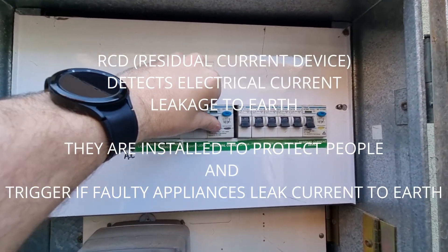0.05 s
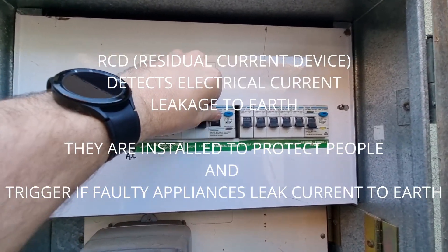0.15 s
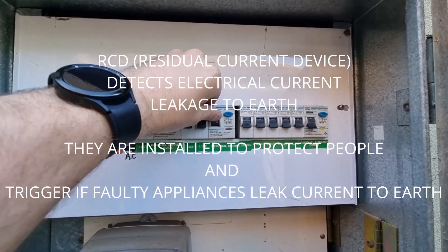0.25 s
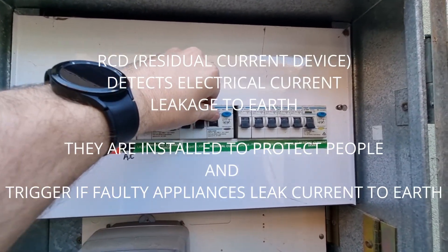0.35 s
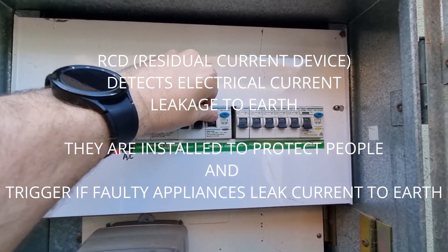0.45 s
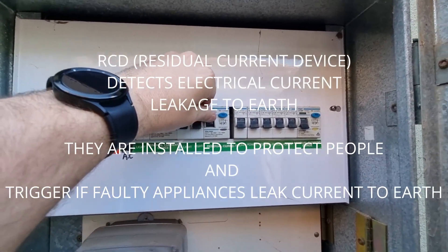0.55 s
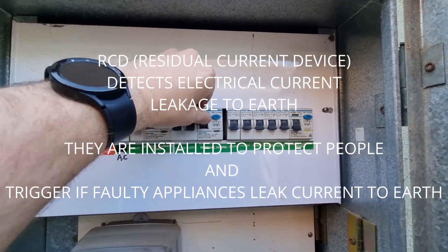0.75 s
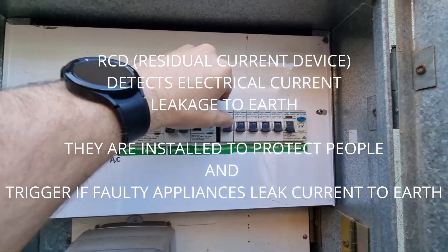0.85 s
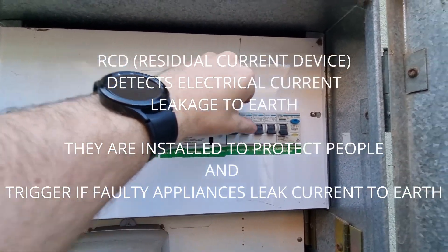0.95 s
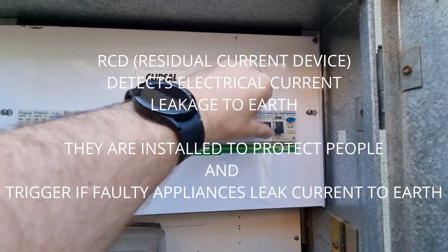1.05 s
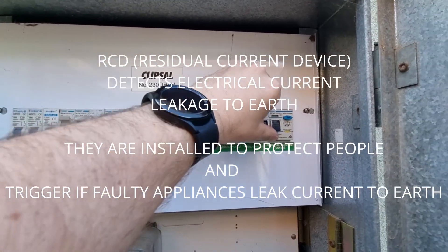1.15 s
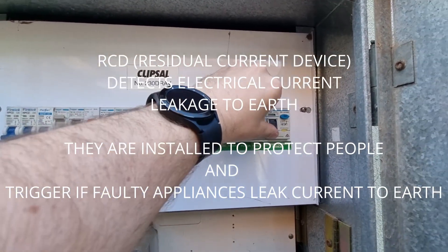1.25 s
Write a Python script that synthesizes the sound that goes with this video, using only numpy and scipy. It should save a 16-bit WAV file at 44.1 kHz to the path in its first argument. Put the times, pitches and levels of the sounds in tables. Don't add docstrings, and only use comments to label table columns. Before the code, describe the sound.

Close up, a circuit breaker switch is flicked once with a crisp double click and hollow thud, small knocks trailing after; then only far traffic, low gusts, barely audible birds and hiss outdoors.

```python
import sys
import numpy as np
from scipy import signal
from scipy.fft import rfft, irfft, next_fast_len
from scipy.io import wavfile
from scipy.ndimage import map_coordinates

SR = 44100
rng = np.random.default_rng(int(sys.argv[2]) if len(sys.argv) > 2 else 0)


def volts_from_db(level):
    exponent = np.asarray(level, float) / 20
    return 10 ** exponent


def int16_out(signal):
    q = np.round(np.clip(np.atleast_2d(signal).T, -1, 1) * 32767)
    wavfile.write(sys.argv[1], SR, q.astype(np.int16))


N = 57330

# (time [s], crack level [dB], crack t60 [s], panel blow level [dB], knock pitch [Hz])
CONTACTS = [(-.002, -90, 0.068, -48.5, 266), (.008, -100, 0.046, -61.5, 785),
            (0.023, -71.5, 0.082, -82.5, 895), (.102, -74, 0.025, -75.5, 960),
            (.1216, -54, 0.089, -55.5, 910), (.140, -63, 0.036, -51.5, 377), (0.145, -75, 0.041, -73, 2406),
            (.2390, -24.5, 0.05, -43.5, 2460), (0.2446, -33, 0.048, -37, 1020),
            (0.2693, -36.5, 0.047, -32.5, 410), (0.2732, -42.5, 0.098, -30, 943),
            (.289, -45.5, 0.077, -30, 471), (0.3138, -49, 0.056, -45, 1140), (.326, -64, 0.034, -35, 420),
            (0.348, -62.5, 0.095, -64, 460), (.415, -72.5, .06, -52, 630), (.844, -78, 0.026, -73.5, 1310),
            (1.278, -100.5, .05, -51.5, 320)]
# (time [s], level [dB], pitch [Hz], t60 [s])
KNOCKS = [(.002, -44.5, 280, 0.043), (0.011, -55.5, 840, 0.067), (.024, -79, 2380, 0.046),
          (.027, -52.5, 890, 0.049), (.037, -77, 410, 0.018), (.126, -63, 2270, 0.042),
          (.124, -63, 910, 0.033), (.147, -66, 2350, 0.06), (.2694, -16.5, 290, .045),
          (.2425, -47, 1090, .05), (.246, -37, 880, 0.04), (.243, -40.5, 165, 0.11), (.272, -43, 180, 0.1),
          (.2745, -29, 845, 0.076), (.300, -39, 276, 0.27), (.303, -36.5, 465, .16),
          (.350, -36.5, 420, 0.11), (.412, -52, 827, 0.11), (.1265, -61, 8050, .045),
          (.248, -42, 257, 0.063), (.3137, -46, 5700, .025), (.3142, -49, 6600, 0.022),
          (0.396, -51, 420, 0.12), (.29, -44, 149.7, 0.14), (.348, -48, 575, 0.11), (.318, -40, 455, 0.089),
          (.322, -40.5, 270, 0.14), (.282, -34, 594, 0.089), (.2700, -31, 571, 0.052),
          (.2702, -37, 1340, 0.042), (0.2918, -19.5, 393, 0.022), (.438, -42, 390, 0.07),
          (.598, -58.5, 636, 0.028), (.8452, -59.5, 1084, 0.046), (1.279, -62, 320, 0.086)]
# (time [s], level [dB], t60 [s])
SNAPS = [
    (.1225, -56, .016),
    (.1435, -63, .006),
    (.2392, -30, .012),
    (.2692, -32, .007),
]
# (end [s], build-up [s], start pitch [Hz], end pitch [Hz], peak level [dB], overtone level [dB])
SQUEAKS = [
    (0.123, 0.0089, 7610, 7930, -46.5, -26),
    (0.2412, .014, 5200, 6126, -28.5, -4.5),
]
# (frequency [Hz], density [dB])
CRACK = [(710, -25), (1200, -31), (1660, -17.5), (3440, -5.5), (3750, -18), (4460, -7.5), (5350, -0.5),
         (7390, -1.5), (15700, -12)]
# (frequency [Hz], level [dB], t60 [s])
CASE = [(2125, -11, 0.17), (2577, -6, 0.079), (3847, -5.5, 0.058), (5530, 1, 0.0158), (6860, -12, 0.037),
        (5620, 9, 0.03), (6490, 5, 0.025), (8460, -8, 0.02), (9480, 0, 0.017), (11600, -10, 0.025),
        (11020, -14, 0.017), (13800, -8, 0.02)]
# (frequency [Hz], level [dB], t60 [s])
PANEL = [(270, -4.5, 0.29), (385.4, -13, 0.49), (420, -12.5, 0.49), (472.6, -7, 0.53), (565, -25, 0.22),
         (859.5, -16, 0.22), (1078, -16, 0.12), (1194, -25, 0.26), (1477, -23.5, 0.3), (1657, -22.5, 0.25),
         (1790, -27, 0.13), (1968, -21.5, 0.26), (2418, -23.5, 0.13), (790.6, -14.5, 0.18)]
# (frequency [Hz], density [dB])
BOOM = [(35, -58.5), (60, -6), (183, -2.5), (255, -0.5), (404, -4), (1560, -16.5), (1710, -25.5),
        (2000, -16), (6000, -20.5), (7800, -61), (13200, -120)]
# (frequency [Hz], t60 [s])
BOOM_T60_S = [(100, 0.34), (300, 0.3), (900, 0.24), (2500, 0.24), (6000, 0.155)]
# (frequency [Hz], t60 [s])
BOX = [(500, 0.41), (3000, 0.28), (12000, 0.11)]
# (time [s], roar level [dB], bright edge level [dB])
TRAFFIC = [(0, -70, -3), (.5, -67, 3), (.67, -71.5, -11), (.8, -72, 6.5), (.92, -72, 6), (1.02, -71, -7),
           (1.15, -70, -5.5), (1.3, -71, 8.5)]
# (frequency [Hz], density [dB])
ROAR = [(110, -23.5), (180, -8.5), (420, 0), (495, -11.5), (598, 0.5), (697, -8.5), (1040, -9),
        (3000, -49.5), (3900, -57), (6600, -120)]
# (frequency [Hz], density [dB])
EDGE = [(800, -120), (1100, -2), (1500, 2), (2100, -12.5), (2800, -120)]
# (time [s], rumble level [dB])
GUSTS = [(0.0, -58), (0.046, -79), (0.136, -61.5), (0.21, -65), (0.269, -58), (0.314, -64), (0.35, -56),
         (0.404, -71), (0.44, -59.5), (0.492, -64.5), (0.516, -72.5), (0.636, -71.5), (0.654, -66),
         (0.73, -62.5), (0.756, -68.5), (0.976, -68.5), (1.056, -63), (1.3, -71)]
# (frequency [Hz], density [dB])
RUMBLE = [(15, -60), (30, -26), (45, -1), (65, 2.5), (129, -1), (204, -20), (250, -10), (320, -57),
          (550, -120)]
# (time [s], length [s], start pitch [Hz], end pitch [Hz], level [dB])
CHIRPS = [(.519, .055, 3630, 3530, -81), (.568, .045, 3550, 3650, -83), (.676, .02, 3700, 3650, -82),
          (.705, .027, 3500, 3450, -86), (.63, .08, 2300, 2160, -87), (.75, .015, 3720, 3730, -85),
          (.83, .04, 3550, 3560, -86), (.879, .025, 3600, 3400, -81), (.905, .05, 3550, 3500, -89),
          (.912, .06, 2320, 2350, -88), (1.199, .04, 3800, 3720, -83), (1.244, .04, 3400, 3400, -88)]
# (frequency [Hz], density [dB])
HISS = [(1470, -18.5), (2500, -3.5), (3150, -9.5), (3560, -5), (3930, -6), (5390, -2.5), (8420, -2),
        (15700, -7.5)]
# (frequency [Hz], gain [dB])
SIDE_GAIN = [(300, -63.5), (2000, -20.5), (5000, -11.5), (9000, -8.5), (14000, -4.5)]
# (frequency [Hz], density [dB])
SNAP_EDGE = [(1500, -20), (5000, 4), (15500, 0)]
SCRAPE = [(1040, -30), (5200, 0), (12000, -4), (15500, -12)]

CASE_DB, CRACK_RISE_S = -12, .0011
TICK_DB, TICK_T60_S = -1, 0.0092
HARD_DB, DULLEST_DB, DULL_DB_PER_OCT, DULL_HZ = -44, -5, 2.5, 7000
RING_DB, BOOM_DB, BLOW_RISE_S = -7.5, -9, 0.00027
KNOCK_WIDTH_RATIO = 0.69
SQUEAK_RISE_DB, SQUEAK_T60_S, SQUEAK_ROUGH_RATIO = 28, .035, .45
TONE_STEEPER_RATIO = 1.1
WAVER_RATIO, HARSH_SHARE, SCRAPE_DB = .05, 0.3, -5
BOX_DB, EDGE_DB, HISS_DB = -25, -17.5, -77
BROKEN_DB = 3
SIDE_DB, SIDE_LAG_SAMPLES, PORT_RUMBLE_DB, PORT_PANEL_DB = -19.5, 3, -40, -54
TOP_HZ = 15850


def unit(x):
    return x / np.sqrt(np.mean(x ** 2) + 1e-20)


def along(points, hz):
    f, v = np.transpose(points)
    return np.interp(np.log(hz + 1), np.log(f + 1), v)


def wobble(rate_hz, size=N):
    knots = rng.standard_normal(int(size * rate_hz / SR) + 4)
    return map_coordinates(knots, [np.arange(size) * rate_hz / SR])


def filtered(x, response):
    m = next_fast_len(x.shape[-1] + 8192)
    spectrum = rfft(x, m) * response(np.fft.rfftfreq(m, 1 / SR))
    return irfft(spectrum, m)[..., :x.shape[-1]]


def noise(spectrum, size=N):
    return unit(filtered(rng.standard_normal(size), lambda hz: volts_from_db(along(spectrum, hz))))


def dying(x, decays):
    hz, t, z = signal.stft(x, SR, nperseg=256)
    decay = volts_from_db(-60 * t / along(decays, hz)[:, None])
    return signal.istft(z * decay, SR, nperseg=256)[1][:len(x)]


def ring(modes, t):
    out = np.zeros(len(t))
    for k, (hz, db, t60_s) in enumerate(modes):
        level_db = db + rng.normal(0, 1.7) - 60 * t / t60_s
        out += (-1) ** k * volts_from_db(level_db) * np.sin(2 * np.pi * hz * t)
    return out


def empty_track():
    return np.zeros(N + 2 * SR)


def add(track, s, x):
    track[SR + round(s * SR):][:len(x)] += x


def trimmed(track):
    return track[SR:SR + N]


def housing_crack(crack_db, t60_s, t):
    crack = noise(CRACK, size=len(t)) * volts_from_db(-60 * t / t60_s)
    crack += volts_from_db(CASE_DB) * ring(CASE, t)
    crack += volts_from_db(TICK_DB - 60 * t / TICK_T60_S) * rng.standard_normal(len(t))
    softness_db = np.clip(crack_db - HARD_DB, DULLEST_DB, 0)

    def dull(f):
        octaves = np.log2(np.maximum(f / DULL_HZ, 1))
        return volts_from_db(DULL_DB_PER_OCT * softness_db * octaves)

    return volts_from_db(crack_db) * filtered(crack, dull) * (1 - np.exp(-t / CRACK_RISE_S))


def panel_blow(blow_db, hz, t):
    panel = volts_from_db(BOOM_DB) * dying(noise(BOOM, size=len(t)), BOOM_T60_S)
    panel += volts_from_db(RING_DB) * ring(PANEL, t)

    def knock(f):
        damping = 1j * f * hz * KNOCK_WIDTH_RATIO
        return volts_from_db(-along(BOOM, hz)) * damping / (hz * hz - f * f + damping)

    return volts_from_db(blow_db) * filtered(panel * (1 - np.exp(-t / BLOW_RISE_S)), knock)


def contacts():
    bright, low, t = empty_track(), empty_track(), np.arange(SR // 2) / SR
    for s, crack_db, t60_s, blow_db, hz in CONTACTS:
        add(bright, s, housing_crack(crack_db, t60_s, t))
        add(low, s, panel_blow(blow_db, hz, t))
    return trimmed(bright), trimmed(low)


def snaps():
    out, t = empty_track(), np.arange(SR // 2) / SR
    for s, db, t60_s in SNAPS:
        add(out, s, volts_from_db(db - 60 * t / t60_s) * noise(SNAP_EDGE, size=len(t)))
    return trimmed(out)


def squeaks():
    out, t = empty_track(), np.arange(SR // 10) / SR
    size = len(t)
    for end_s, rise_s, hz0, hz1, db, over_db in SQUEAKS:
        waver = 1 + WAVER_RATIO * volts_from_db(HARSH_SHARE * over_db) * wobble(600, size)
        hz = np.interp(t, [0, rise_s], [hz0, hz1]) * waver
        phase = 2 * np.pi * np.cumsum(hz) / SR
        building_db = SQUEAK_RISE_DB * (t / rise_s - 1)
        level_db = np.where(t < rise_s, building_db, -60 * (t - rise_s) / SQUEAK_T60_S)
        tone = np.sin(phase) + volts_from_db(over_db) * np.sin(2 * phase)
        tone *= 1 + SQUEAK_ROUGH_RATIO * wobble(867, size)
        scrape = volts_from_db(SCRAPE_DB + HARSH_SHARE * over_db) * noise(SCRAPE, size)
        squeak = volts_from_db(TONE_STEEPER_RATIO * level_db) * tone + volts_from_db(level_db) * scrape
        add(out, end_s - rise_s, volts_from_db(db) * np.minimum(t / 0.00201, 1) * squeak)
    return trimmed(out)


def knocks():
    out, t = empty_track(), np.arange(SR // 5) / SR
    for s, db, hz, t60_s in KNOCKS:
        thump = volts_from_db(db - 60 * t / t60_s) * np.sin(2 * np.pi * hz * t)
        add(out, s, thump * (1 - np.exp(-t * hz / 0.62)))
    return trimmed(out)


def box(x):
    tail = dying(rng.standard_normal(SR // 2), BOX)
    return signal.fftconvolve(x, tail / np.linalg.norm(tail))[:N]


def traffic():
    s, roar_db, edge_db = np.transpose(TRAFFIC)
    t = np.arange(N) / SR
    edge = volts_from_db(EDGE_DB + np.interp(t, s, edge_db)) * noise(EDGE)
    return volts_from_db(np.interp(t, s, roar_db) + 0.6 * wobble(10)) * (noise(ROAR) + edge)


def rumble():
    s, db = np.transpose(GUSTS)
    level_db = np.interp(np.arange(N) / SR, s, db) + 0.86 * wobble(33)
    return volts_from_db(level_db) * noise(RUMBLE)


def birds():
    out = empty_track()
    for s, length_s, hz0, hz1, db in CHIRPS:
        u = np.linspace(0, 1, round(length_s * SR))
        hz = (hz0 + (hz1 - hz0) * u) * (1 + 0.012 * wobble(230, size=len(u)))
        phase = 2 * np.pi * np.cumsum(hz) / SR
        flutter = unit(volts_from_db(BROKEN_DB * wobble(130, size=len(u))))
        add(out, s, volts_from_db(db) * flutter * np.sin(np.pi * u) ** .5 * np.sin(phase))
    return trimmed(out)


def hiss():
    return volts_from_db(HISS_DB) * noise(HISS)


def scene():
    bright, low = contacts()
    bright = bright + snaps() + squeaks()
    low = low + knocks()
    mid = bright + low + volts_from_db(BOX_DB) * box(bright)
    mid = mid + traffic() + rumble() + birds() + hiss()
    other = volts_from_db(SIDE_DB) * np.roll(bright, SIDE_LAG_SAMPLES) + hiss()
    side = filtered(other, lambda hz: volts_from_db(along(SIDE_GAIN, hz)))
    side = side + volts_from_db(PORT_RUMBLE_DB) * rumble() + volts_from_db(PORT_PANEL_DB) * box(low)
    return np.array([mid - side, mid + side])


def low_pass(x):
    return signal.sosfilt(signal.butter(12, 15840, fs=SR, output="sos"), x)


def record(dry):
    mix = filtered(dry, lambda hz: np.clip((TOP_HZ - hz) / 250, 0, 1))
    return low_pass(mix)


dry = scene()
out = record(dry)
int16_out(out)
```